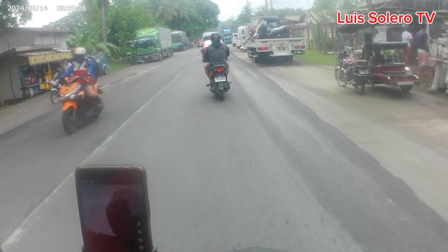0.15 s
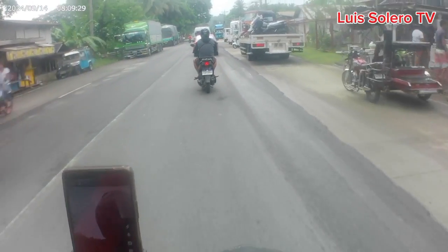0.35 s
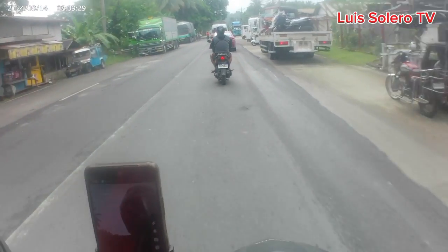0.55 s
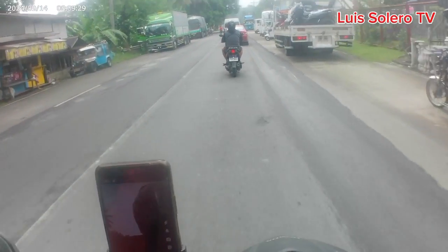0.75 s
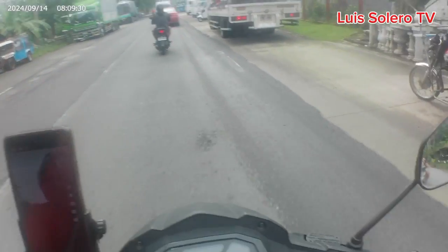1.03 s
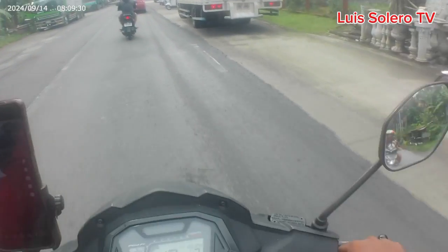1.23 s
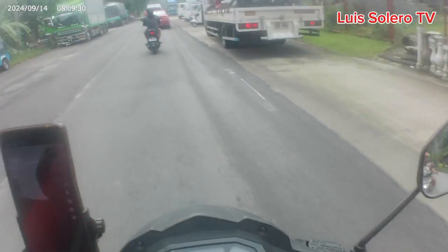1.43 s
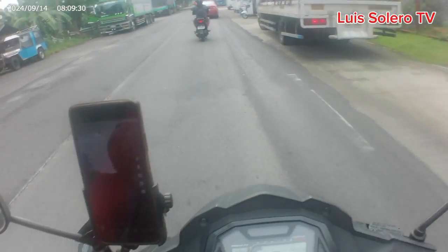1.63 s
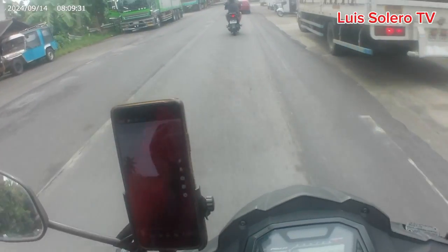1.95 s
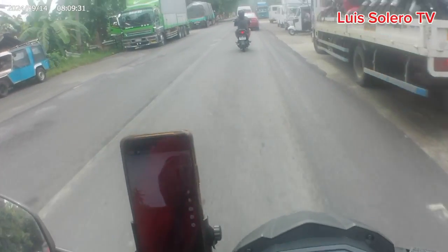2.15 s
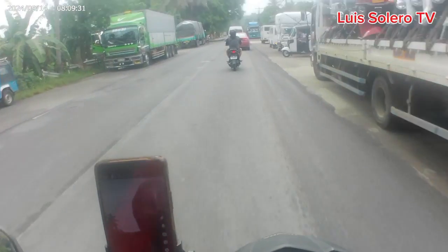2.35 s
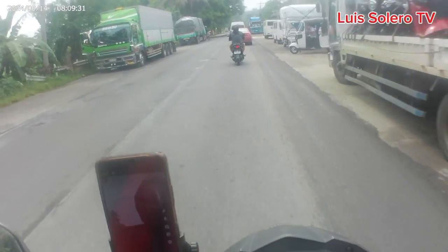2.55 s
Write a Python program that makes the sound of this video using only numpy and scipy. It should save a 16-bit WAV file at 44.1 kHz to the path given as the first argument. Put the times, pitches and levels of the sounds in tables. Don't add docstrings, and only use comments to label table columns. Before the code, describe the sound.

Violent handling thumps, cracks and scrapes overload a microphone sealed in a plastic case during the first half second, then a much quieter motorcycle ride: dull road roar, faint low engine hum, wind rumble and a thin breathy whistle.

```python
import sys
import numpy as np
from scipy import signal
from scipy.io import wavfile

SR = 44100
rng = np.random.default_rng(int(sys.argv[2]) if len(sys.argv) > 2 else 0)


def invert_db(x):
    u = np.asarray(x, float) / 20
    return 10 ** u


def int16_out(signal):
    q = np.round(np.clip(np.atleast_2d(signal).T, -1, 1) * 32767)
    wavfile.write(sys.argv[1], SR, q.astype(np.int16))


N = 119070

# start_s, level_db
ROAR_LEVEL = [(0.55, -51.5), (0.61, -53), (0.87, -56), (1.24, -53), (2.23, -52.5), (2.67, -50.5)]
# frequency_hz, density_db (per Hz)
ROAR_SPECTRUM = [(100, -30.5), (170, 0.5), (856, -8.5), (1330, -5.5), (1510, -6.5), (2010, -8.5),
                 (3000, -21.5), (4390, -26.5), (16000, -54)]
# pitch_hz, width_hz, level_db (over the roar)
CASE_CAVITIES = [(304, 73, 1.5), (1903, 350, 1.5), (2560, 230, -9.5), (3510, 230, -13.5), (4310, 520, -10),
                 (4740, 310, -16)]
# start_s, level_db, pitch_hz
WHISTLE_PATH = [(0.55, -52.5, 1338), (0.68, -55.5, 1305), (0.69, -57, 1337), (1.3, -56.5, 1363),
                (1.32, -60.5, 1306), (1.64, -54, 1358), (1.7, -56, 1325), (2.03, -57, 1320),
                (2.33, -49, 1350), (2.47, -52, 1369), (2.5, -48, 1398), (2.59, -63, 1267),
                (2.65, -61, 1384), (2.7, -54, 1278)]
# start_s, pitch_hz, level_db
ENGINE_PATH = [(0.6, 118.7, -47), (0.77, 113.1, -47), (0.85, 134.4, -40.5), (1.08, 148.2, -46.5),
               (1.16, 129.4, -41), (1.68, 130.4, -37), (1.76, 122.4, -40.5), (2.57, 136.3, -43),
               (2.6, 131.2, -57), (2.7, 143.2, -36)]
# multiple (of the second order), level_db
ORDER_LEVELS = [
    (.25, -8),
    (.5, -9.5),
    (1, -2.5),
    (2, -10.5),
    (2.5, -11.5),
    (3.8, -20.5),
]
# start_s, level_db
BUFFET_LEVEL = [(0.62, -37.5), (0.69, -36.5), (0.75, -37), (0.81, -40), (0.86, -57), (1.04, -31),
                (1.15, -43.5), (1.21, -40.5), (1.38, -43), (1.91, -36.5), (2.08, -42), (2.11, -38.5),
                (2.66, -37), (2.7, -32)]
# frequency_hz, density_db (per Hz)
BUFFET_SPECTRUM = [(14, -3), (33, 8), (55, -5.5), (90, -6), (140, -8), (220, -25.5)]
# start_s, length_s, level_db, centre_hz, width_hz
SKIN_RUBS = [
    (-.01, .06, -44, 4500, 3000),
    (.105, .035, -50, 4200, 1500),
    (.228, .04, -34, 700, 900),
    (.304, .055, -36, 3600, 1800),
    (.335, .022, -22, 1500, 1300),
    (.336, .018, -36, 3400, 1500),
    (.359, .042, -25, 1150, 700),
    (.355, .046, -37, 3900, 800),
    (.422, .022, -24, 750, 400),
    (.40, .075, -21, 250, 110),
]
# start_s, height (signed), swing_hz, t60_s
AIR_SHOVES = [(.006, -.25, 32, .9), (.1265, -1.0, 38, .07), (.138, .55, 22, .09), (.1455, .9, 55, .05),
              (.1515, -.8, 70, .04), (.1943, -2.4, 75, .025), (.200, .3, 20, .2), (.222, -.2, 45, .15),
              (.276, .32, 22, .5), (.3178, 1.5, 70, .03), (.3205, .9, 45, .05), (.325, -1.0, 40, .05),
              (.341, 1.1, 21, .13), (.363, -1.2, 40, .05), (.381, .35, 60, .08), (.4015, .3, 140, .07),
              (.4236, 1.1, 110, .05), (.4278, -1.9, 62, .04), (.4355, 2.4, 90, .04),
              (.4405, -1.2, 200, .04), (.4515, -1.4, 90, .08), (.4565, 1.0, 92, .14), (.484, .3, 46, .3)]
KNOCK_TIMES = [.1272, .1525, .1946, .2212, .2328, .2386, .2486, .3135, .3185, .3255, .3335, .349, .4243,
               .4262]
# peak_db, contact_s, brightness_hz
KNOCK_CONTACTS = [(-17.5, 0.0014, 4000), (-14.5, .0015, 5000), (0.5, .0025, 3170), (-12.5, .002, 2500),
                  (-11, .002, 2000), (-5.5, 0.0018, 1800), (-7, 0.00067, 1760), (-24, .002, 3000),
                  (-19.5, .002, 900), (-9, .005, 2100), (0, .003, 6130), (-5, .004, 2000),
                  (-10, .001, 2500), (0.5, .002, 760)]
# pitch_hz, level_db, t60_s
SHELL_MODES = [(550, -4, .02), (850, -8, .015), (1340, -3, .02), (1720, -2, .016), (2280, -6, .011),
               (3100, -5, .008), (4100, -8, .008), (5500, -22, .006)]
# centre_hz, width_hz, level_db
SCOOTER_BANDS = [
    (2240, 430, -49),
    (4600, 1100, -59),
    (5470, 230, -65),
]


def rms_one(x):
    return x / np.sqrt(np.mean(x ** 2) + 1e-20)


def in_time(rows):
    s, *columns = np.transpose(rows)
    return [np.interp(np.arange(N) / SR, s, column) for column in columns]


def lowpass(x, hz, order=2):
    return signal.sosfilt(signal.butter(order, hz, fs=SR, output="sos"), x)


def drift(rate_hz):
    r = np.exp(-80 * np.pi * rate_hz / SR)
    slow = signal.lfilter([1], [1, -2 * r, r * r], rng.standard_normal(N // 40 + 2002))
    slow = slow[2000:]
    return np.interp(np.arange(N) / 40, np.arange(len(slow)), rms_one(slow - slow.mean()))


def resonate(x, hz, width_hz):
    r = np.exp(-np.pi * width_hz / SR)
    feedback = [1, -2 * r * np.cos(2 * np.pi * hz / SR), r * r]
    return signal.lfilter([(1 - r * r) / 2, 0, (r * r - 1) / 2], feedback, x)


def resonate_twice(x, hz, width_hz):
    return rms_one(resonate(resonate(x, hz, width_hz), hz, width_hz))


def narrow_noise(hz, width_hz):
    return resonate_twice(rng.standard_normal(N), hz, width_hz)


def banded_noise(spectrum, patchy_db, rate_hz):
    hz, db = np.transpose(spectrum)
    edges = np.geomspace(hz[0], hz[-1], int(3 * np.log2(hz[-1] / hz[0])) + 1)
    together = drift(rate_hz)
    white = rng.standard_normal((2, N + SR))
    out = 0
    for k, (low, high) in enumerate(zip(edges, edges[1:])):
        sos = signal.butter(2, [low, high], "band", fs=SR, output="sos")
        band = signal.sosfilt(sos, white[k % 2])[SR:]
        level_db = np.interp(np.log(low * high) / 2, np.log(hz), db)
        flicker_db = patchy_db * (.7 * together + drift(rate_hz * 3))
        out = out + band * invert_db(level_db + flicker_db)
    return rms_one(out)


def buffet():
    level_db, = in_time(BUFFET_LEVEL)
    return invert_db(level_db + 4.5) * banded_noise(BUFFET_SPECTRUM, patchy_db=-1.34, rate_hz=6.0)


def roar():
    level_db, = in_time(ROAR_LEVEL)
    cavities = sum(invert_db(db + 0.52 * drift(9)) * narrow_noise(hz, width) for hz, width, db in CASE_CAVITIES)
    wall = invert_db(7.0) * banded_noise(ROAR_SPECTRUM, patchy_db=0.55, rate_hz=6.2)
    hum = lowpass(wall, 900, order=1)
    hum_growth_db = 0.5 * (np.arange(N) - N / 2) / SR
    return invert_db(level_db) * (wall + hum * (invert_db(hum_growth_db) - 1) + cavities)


def whistle():
    width_hz, core_jitter_hz, trim_db = 150, 14, 6
    level_db, hz = in_time(WHISTLE_PATH)
    phase = 2 * np.pi * np.cumsum(hz) / SR
    a, b = rms_one(lowpass(rng.standard_normal((2, N)), width_hz / 2))
    breath = a * np.cos(phase) + b * np.sin(phase)
    wander = 2 * np.pi * np.cumsum(core_jitter_hz * drift(25.0)) / SR
    core_db = -2.5 + 0.3 * (level_db - level_db.mean()) + 1.1 * drift(40.0)
    core = np.sin(phase + wander) * invert_db(core_db)
    return invert_db(level_db + trim_db) * (breath + core)


def engine():
    wobble_db, speed_jitter = 3.5, .015
    hz, level_db = in_time(ENGINE_PATH)
    phase = 2 * np.pi * np.cumsum(hz * (1 + speed_jitter * drift(6.9))) / SR
    return sum(invert_db(level_db + db + wobble_db * drift(12.0)) * np.sin(multiple * phase)
               for multiple, db in ORDER_LEVELS)


def rubs():
    t = np.arange(N) / SR
    grit = lowpass(rng.standard_normal(N) * invert_db(2.5 * drift(200)), 5000)
    out = np.zeros(N)
    for s, length, db, hz, width in SKIN_RUBS:
        swell = np.sin(np.pi * np.clip((t - s) / length, 0, 1)) ** 1.5
        out += invert_db(db) * swell * resonate_twice(grit, hz, width)
    return out


def shoves():
    out = np.zeros(N)
    for s, height, hz, t60 in AIR_SHOVES:
        since = np.maximum(np.arange(N) / SR - s, 0)
        out += height * np.sin(2 * np.pi * hz * since) * invert_db(-60 * since / t60)
    return out


def knocks():
    crack = np.zeros(N)
    t = np.arange(SR // 20) / SR
    for s, (db, contact_s, brightness_hz) in zip(KNOCK_TIMES, KNOCK_CONTACTS):
        burst = invert_db(db) * rng.standard_normal(len(t)) * np.exp(-(t / contact_s) ** 2)
        i = int(s * SR)
        crack[i:i + len(t)] += lowpass(burst, brightness_hz)
    rings = sum(invert_db(db) * resonate(crack + 1e-18, hz, np.log(1000) / np.pi / t60)
                for hz, db, t60 in SHELL_MODES)
    return invert_db(-7) * crack + invert_db(11.5) * rings


def scooter():
    pass_s, rise_s, fade_s = .48, .06, .2
    u = np.arange(N) / SR - pass_s
    nearness = 1 / (1 + (u / np.where(u < 0, rise_s, fade_s)) ** 2)
    return nearness * sum(invert_db(db) * narrow_noise(hz, width) for hz, width, db in SCOOTER_BANDS)


def scene():
    ride = buffet() + roar() + whistle() + engine()
    hand = knocks() + rubs() + shoves()
    return (ride + hand + scooter())[None]


def low_pass(x):
    return signal.sosfilt(signal.butter(12, 16500, fs=SR, output="sos"), x)


def record(dry):
    hiss_db, clip_level, bass_cut_hz, top_cut_hz = -69, .98, 13, 16550
    x = dry + invert_db(hiss_db) * rng.standard_normal(dry.shape)
    x = np.clip(x, -clip_level, clip_level)
    x = signal.sosfilt(signal.butter(1, bass_cut_hz, "high", fs=SR, output="sos"), x)
    x = signal.sosfilt(signal.cheby2(12, 60, top_cut_hz, fs=SR, output="sos"), x)
    return low_pass(np.clip(x, -1, 1))


dry = scene()
out = record(dry)
int16_out(out)
```